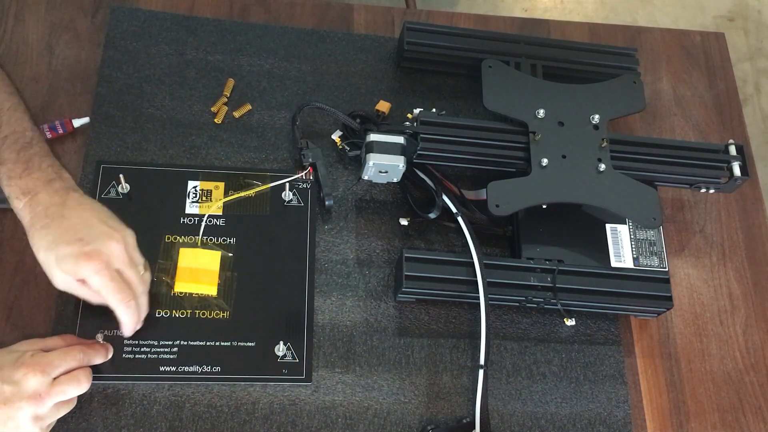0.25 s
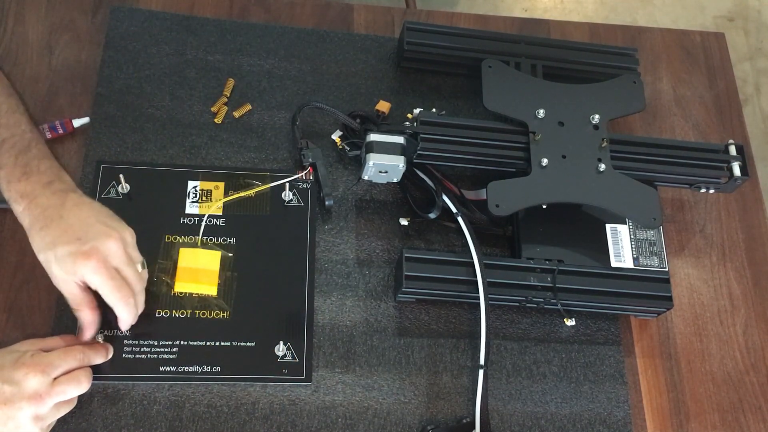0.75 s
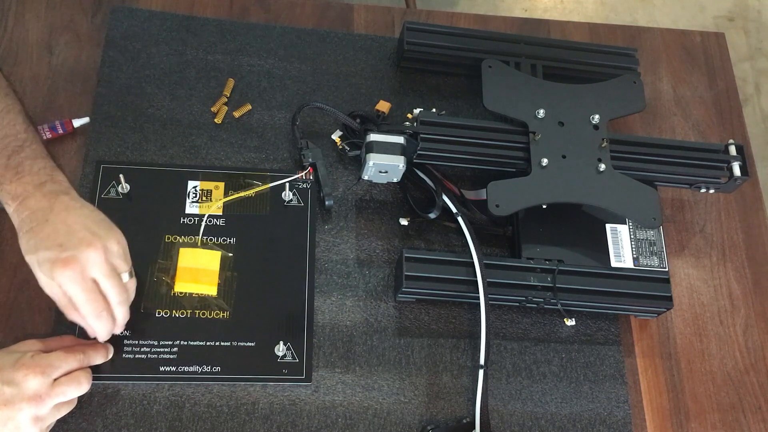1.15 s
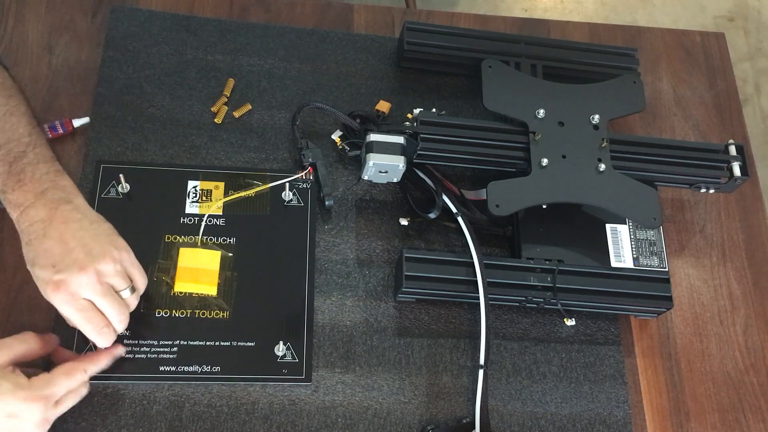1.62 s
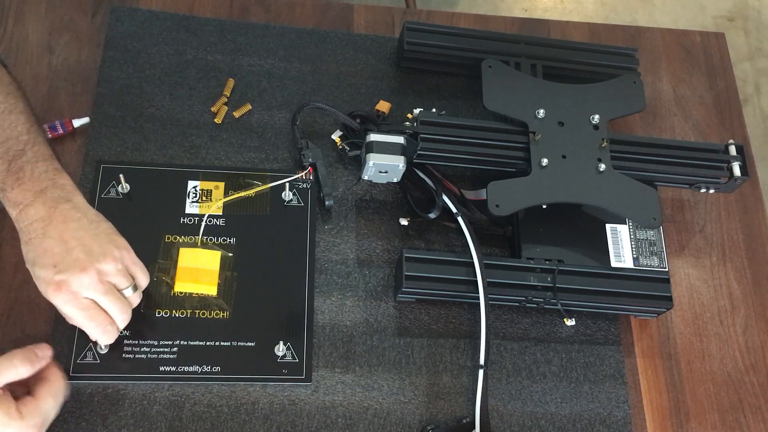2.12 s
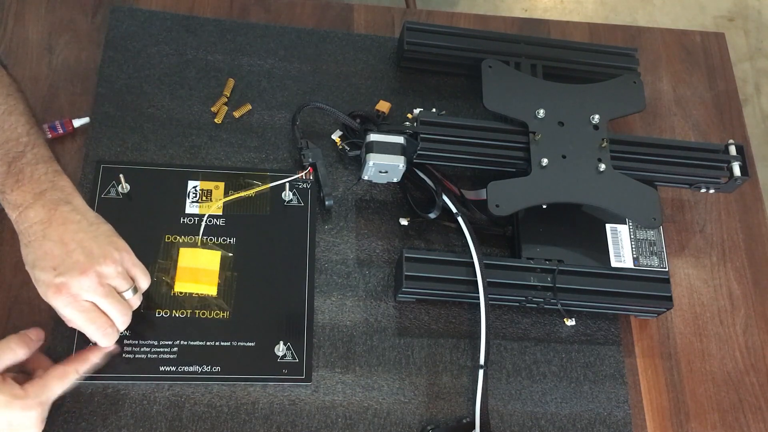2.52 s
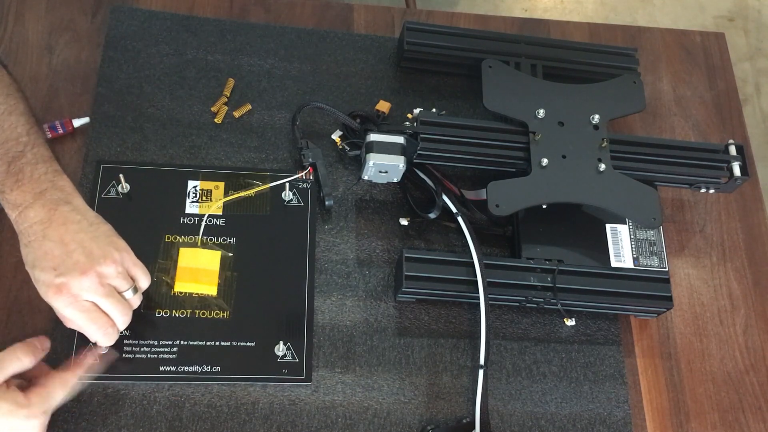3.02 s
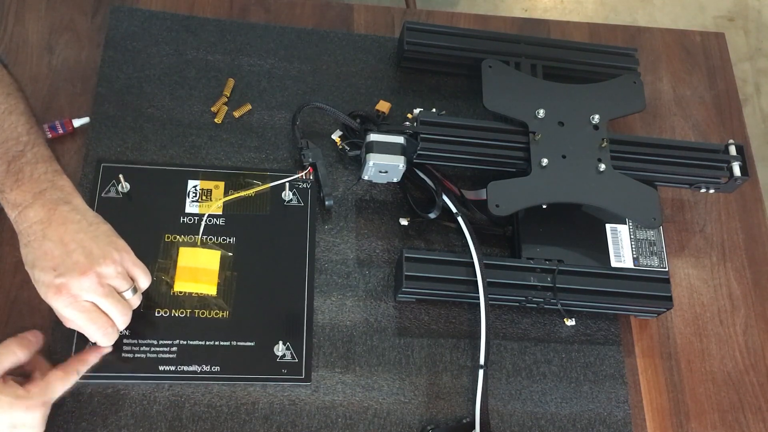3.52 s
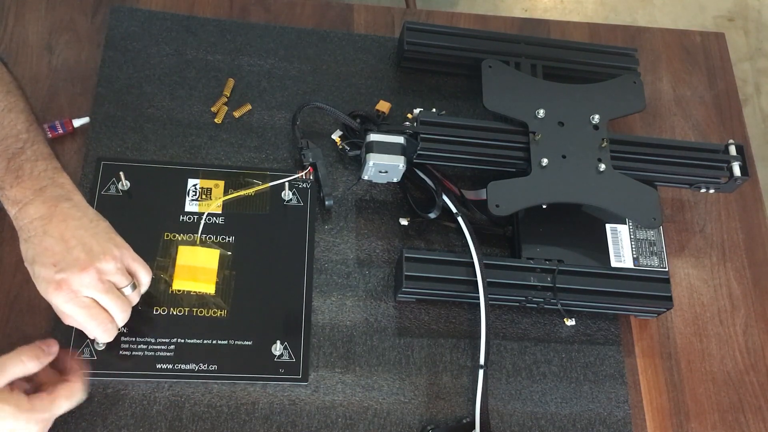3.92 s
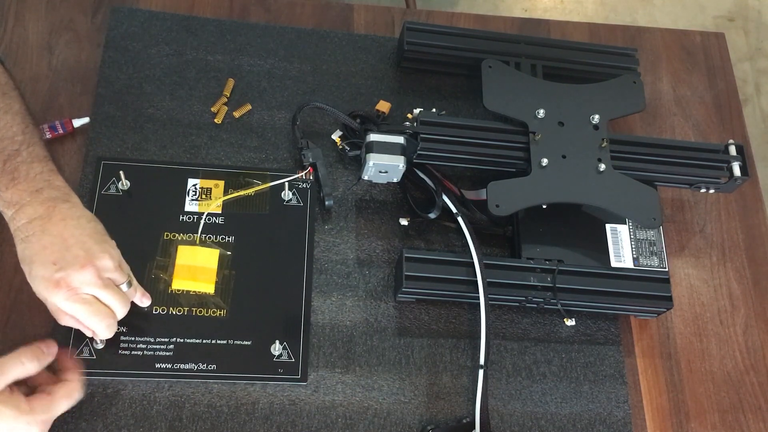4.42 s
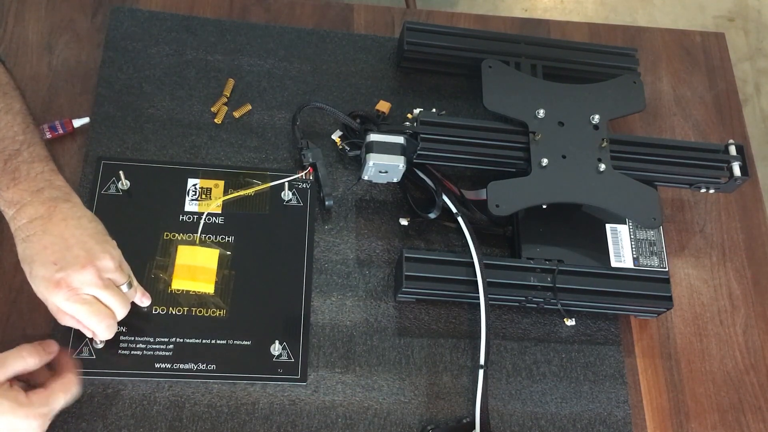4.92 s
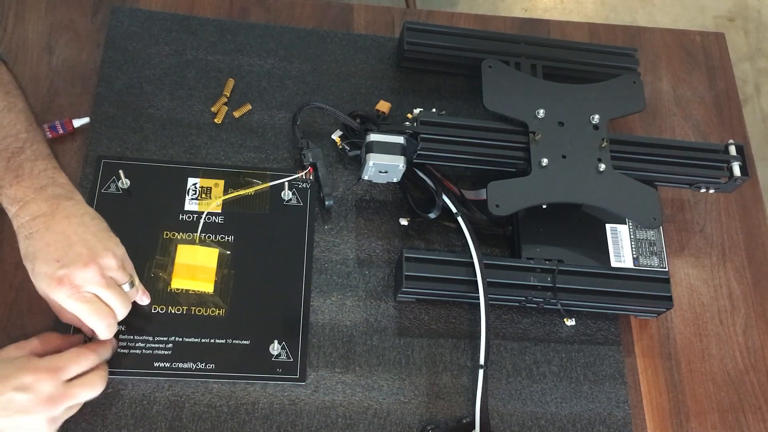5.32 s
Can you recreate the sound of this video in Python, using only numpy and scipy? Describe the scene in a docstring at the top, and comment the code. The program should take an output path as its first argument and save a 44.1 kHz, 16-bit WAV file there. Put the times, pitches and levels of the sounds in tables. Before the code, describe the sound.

In a bare workshop, a steel nut and washer are spun by hand on a screw at a plate's corner. A few faint ticks and soft skin rubs come first, then a regular run of about four strokes a second, each a tick, knock and short ringing scrape, growing louder and brighter. Faint unsteady machine hum continues behind. Close, single-channel pickup with a short diffuse echo.

```python
"""A steel nut is spun by hand down a screw on the corner of a metal plate, at its busiest four strokes a second.
In each stroke the fingers catch the nut (a tick), it breaks free (a knock) and runs along the thread,
rattling its washer (a scrape). The harder the flick, the louder, shorter and brighter the run.
Random collisions ring the modes of screw and plate, and a bare workshop answers with a diffuse noise tail.
Behind the handwork lies the faint hum of machines and fans: unsteady sines and coloured noise, on one channel."""
import sys
import numpy as np
from scipy import signal
from scipy.fft import rfft, irfft, next_fast_len
from scipy.io import wavfile
from scipy.ndimage import map_coordinates

SR = 44100
rng = np.random.default_rng(int(sys.argv[2]) if len(sys.argv) > 2 else 0)


def dump(signal):
    """Clip the signal to [-1, 1] and save it as 16-bit WAV at the path in sys.argv[1]."""
    limited = np.clip(np.atleast_2d(signal).T, -1, 1)
    pcm = np.round(limited * 32767).astype(np.int16)
    wavfile.write(sys.argv[1], SR, pcm)


N = 244755

# Flicks of the nut: [catch t/s, catch level/dB before the lift in tick(), catch brightness/(dB/octave),
# time held until it breaks free/s, knock level/dB before that lift, time from then to full spin/s, run level/dB]
FLICKS = [(.236, -51.5, -1.5, .044, -48, 0.017, -46.5), (.541, -46.5, -1, 0.045, -42, .02, -46.5),
          (0.856, -48.5, 2.5, 0.066, -38.5, .032, -46), (1.488, -42, 3, .004, -46, .008, -54),
          (2.1, -49, -4, .037, -34, .034, -39.5), (2.343, -39, -7, .052, -28.5, .029, -34.5),
          (2.614, -45.5, -5.5, .039, -30, .008, -31), (2.866, -41, -4, .038, -28.5, .044, -29.5),
          (3.112, -40, -3, .021, -30.5, 0.031, -30), (3.351, -37, -0.5, 0.022, -34, .013, -27.5),
          (3.604, -38, -4, .039, -32.5, .005, -29.5), (3.857, -37.5, -8, 0.031, -42, .007, -28),
          (4.114, -41, 4.5, 0.029, -29, .015, -29), (4.362, -35, 6.5, 0.048, -34, .005, -23),
          (4.63, -28, 5, 0.038, -35.5, .005, -26)]


def amp(db):
    """Decibels to gain."""
    return 10 ** (np.asarray(db) / 20)


def rms(x):
    """Root mean square."""
    return np.sqrt(np.mean(x ** 2))


def unit(x):
    """Scale to rms 1."""
    return x / np.sqrt(np.mean(x ** 2) + 1e-20)


def along(points, hz):
    """Interpolate (Hz, value) points on a log frequency axis."""
    f, v = np.transpose(points)
    return np.interp(np.log(hz + 1), np.log(f + 1), v)


def curve(rows):
    """Interpolate (s, value) rows to one value per sample."""
    return np.interp(np.arange(N) / SR, *np.transpose(rows))


def wobble(rate, size=N):
    """A smooth random curve with rate knots a second."""
    knots = rng.standard_normal(int(size * rate / SR) + 4)
    return map_coordinates(knots, [np.arange(size) * rate / SR])


def filtered(x, response):
    """Multiply the spectrum of x by a response of frequency."""
    m = next_fast_len(len(x) + 8192)  # zero padding leaves room for ringing
    return irfft(rfft(x, m) * response(np.fft.rfftfreq(m, 1 / SR)), m)[:len(x)]


def noise(spectrum, size=N):
    """Noise of rms 1, coloured by (Hz, dB) points."""
    return unit(filtered(rng.standard_normal(size), lambda hz: amp(along(spectrum, hz))))


def swell(t, rise, fall):
    """Exponential rise to a peak at t = 0, then exponential fall."""
    return np.exp(-np.abs(t) / np.where(t < 0, rise, fall))


def add(track, s, sound):
    """Mix a sound into the track from time s on."""
    start = max(round(s * SR), 0)
    track[start:start + len(sound)] += sound[:N - start]


def tone(hz, wander_hz):
    """A sine of rms 1 whose pitch wanders, as of a slightly unsteady machine."""
    cycles = np.cumsum(hz + wander_hz * wobble(8)) / SR
    return np.sqrt(2) * np.sin(2 * np.pi * (cycles + rng.random()))


def hum():
    """Machines drone and whine as wandering sines; fans move air, heard as coloured noise."""
    # steady machine tones, then fan tones: [f/Hz, level/dB, wander/Hz]
    machine_tones = [(51, -62.5, 1.19), (58.6, -61.5, 0.84), (96.7, -62.5, 4.4), (120.3, -63.5, 0.87),
                     (125.5, -61.5, 0.3), (339.7, -74, 1.08), (361, -73.5, 0.64), (598, -76, 1.75)]
    fan_tones = [(800.5, -72, .3), (873, -76, 1.5), (1943, -82, 1), (2401, -81, 1), (2611, -79, 1),
                 (3205, -84, 1)]
    # a thin high whine that comes and goes: [f/Hz, level/dB before its random swing]
    whine_tones = [(3483, -77), (3505, -81)]
    # a tone that fades out, and a low rush that takes over from it: [t/s, level/dB]
    drone_levels = [(0, -62), (.5, -67), (2.45, -63), (2.7, -65.5), (5.55, -81)]
    rush_levels = [(0, -73), (2.4, -66), (2.7, -61.5), (5.55, -60.5)]
    # colour of moving air: [f/Hz, relative level/dB per Hz]
    air_colour = [(15, -36), (27, -2), (40, 6), (110, 3.5), (150, -3.5), (320, -4.5), (450, -8.5),
                  (600, -6), (1100, -14), (2000, -15), (2550, -15), (3200, -19), (7000, -31.5),
                  (15500, -38.5)]
    tones = sum(amp(db) * tone(hz, wander) for hz, db, wander in machine_tones + fan_tones)
    whine = sum(amp(db + 3.9 * wobble(2.72)) * tone(hz, 4.94) for hz, db in whine_tones)
    drone = amp(curve(drone_levels)) * tone(334, 0.52)
    rush_colour = [(60, -3), (180, -4.5), (300, 6.0), (420, -10.0), (900, -16.5), (2000, -38)]
    rush = amp(curve(rush_levels)) * noise(rush_colour)
    air = amp(-56.5 + 0.05 * wobble(4.1)) * noise(air_colour)
    return tones + whine + drone + rush + air


def workshop(x, wet_db):
    """A sound and its echo: a diffuse tail builds up, then each frequency dies at its own speed."""
    # time for the echo to die by 60 dB: [f/Hz, t60/s]
    decay_times = [(300, 0.33), (1800, 0.6), (5000, 0.6), (9000, 0.53), (14000, 0.41)]
    # colour of the reflections: [f/Hz, relative level/dB]
    wall_colour = [(300, 1.5), (1700, 2), (2500, -4), (3700, 5), (6000, 0.5), (9000, 1.5), (14000, -5.5)]
    build_s = 0.00043
    hz, t, z = signal.stft(rng.standard_normal(SR * 3 // 4), SR, nperseg=256)
    decay = amp(along(wall_colour, hz)[:, None] - 60 * t / along(decay_times, hz)[:, None])
    build = 1 - np.exp(-t / build_s)
    tail = signal.istft(z * decay * build, SR, nperseg=256)[1]
    echo = amp(wet_db) * tail / np.linalg.norm(tail)
    return signal.fftconvolve(x, signal.unit_impulse(len(tail)) + echo)


def resonances(modes, f):
    """Causal response of damped (Hz, width in Hz, dB) modes."""
    return sum(amp(db) * 1j * f * w / (c * c - f * f + 1j * f * w) for c, w, db in modes)


def chatter(size, spread_db):
    """Tiny collisions of rough steel, of widely scattered strength."""
    return rng.standard_normal(size) * amp(spread_db * rng.standard_normal(size))


def contact(grip, spread_db, db, bright, grit_db):
    """Chatter under a force envelope rings the steel and radiates as grit; db is the level at full force."""
    # ring of nut, screw and plate, before each touch shifts it: [f/Hz, width/Hz, relative level/dB]
    steel_modes = [(1310, 150, -25.5), (1776, 93, -9), (1930, 44, -11.5), (2520, 35, -12), (2524, 92, 4.5),
                   (2600, 80, -1.5), (3515, 69, -7.5), (3704, 87, -6.5), (4224, 85, -9.5), (5210, 88, -1.5),
                   (5465, 134, -4), (5635, 180, -5), (6130, 67, -29), (6220, 230, -10), (6774, 135, -7.5),
                   (6800, 190, -17), (8060, 120, -12.5), (8760, 240, -16), (8800, 260, -33),
                   (9740, 320, -9.5), (11040, 240, -8), (12640, 340, -10), (13500, 270, -8),
                   (14000, 110, -24)]
    # the plate's dense weak modes, heard as grit: [f/Hz, relative level/dB per Hz]
    plate_colour = [(150, -3), (500, -16.5), (900, -8), (1400, -14.5), (1800, -1.5), (2600, 3), (4200, 1.5),
                    (5400, 1.5), (7000, 0), (9600, 1), (10500, -25), (11300, 4.5), (12400, -9.5),
                    (14500, -37), (16000, 4)]
    detune, vary_db = 0.007, 2  # scatter of pitch as a fraction, and of level
    # the fingers shift and damp the modes differently at each touch
    modes = [(hz * (1 + detune * rng.normal()), width, level + vary_db * rng.normal())
             for hz, width, level in steel_modes]
    ringing = filtered(chatter(len(grip), spread_db) * grip, lambda hz: resonances(modes, hz))
    grit = filtered(chatter(len(grip), spread_db) * grip, lambda hz: amp(along(plate_colour, hz)))
    sound = unit(ringing) + amp(grit_db) * unit(grit)
    # light collisions last longer and lose the highest treble
    edge_hz = 12000 * amp(0.16 * (db + 54.5))

    def colour(hz):
        tilt = amp(bright * np.log2(np.hypot(hz, 2500) / 4500))  # flattens out below 2500 Hz
        return tilt / np.hypot(1, (hz / edge_hz) ** 3)

    return amp(db) * unit(filtered(sound, colour)) * rms(grip)


def tick(db, bright):
    """A blow of the nut with a few milliseconds of chatter; soft ones mostly ring, hard ones crack."""
    attack_s, fall_s, lift_db = 0.0001, 0.0031, 2.0
    grip = swell(np.arange(SR // 12) / SR - .001, attack_s, fall_s)
    grit_db = 3.0 + 0.93 * bright
    return workshop(contact(grip, 3.35, db + lift_db, bright, grit_db), wet_db=-3)


def catches():
    """Each stroke ticks as the fingers catch the nut, rattles a little and knocks as it breaks free."""
    strays_per_stroke, stray_db, scatter_db = 2, -17, 4  # small ticks, dB against the run
    stray_bright, break_bright = -9, -6  # dB per octave
    track = np.zeros(N)
    for s, catch_db, catch_bright, hold, knock_db, spin_up, run_db in FLICKS:
        add(track, s, tick(catch_db, catch_bright))
        for share in rng.random(strays_per_stroke):  # anywhere from the catch to full spin
            level_db = run_db + stray_db + scatter_db * rng.normal()
            add(track, s + share * (hold + spin_up), tick(level_db, stray_bright))
        add(track, s + hold, tick(knock_db, break_bright))
    return track


def scrapes():
    """The chatter swells as the freed nut spins up, catches unevenly on the thread and dies as it stops."""
    usual_db = -30  # run level of an ordinary flick
    rise_s, fall_s, shortens = 0.0067, 0.011, 0.52  # length goes as amplitude to the power -shortens
    usual_bright, brightens = 0.18, 0.17  # dB per octave, and its gain per dB of flick
    creep_s = .012  # the nut starts to creep just before it breaks free
    track, t = np.zeros(N), np.arange(-SR // 8, SR // 4) / SR  # t = 0 at full spin
    for s, _, _, hold, _, spin_up, db in FLICKS:
        effort_db = db - usual_db
        length = amp(-shortens * effort_db)
        bright = usual_bright + brightens * effort_db
        freed = np.exp(np.minimum(t + spin_up, 0) / creep_s)
        stroke = freed * swell(t, rise_s * length, fall_s * length)
        uneven = stroke * amp(0.5 * wobble(395.5, size=len(t)))
        grip = unit(uneven) * rms(stroke)
        sound = contact(grip, 5, db, bright, grit_db=1 + 0.19 * bright)
        add(track, s + hold + spin_up + t[0], workshop(sound, wet_db=-5.0))
    return track


def fingertip_taps():
    """A fingertip taps the plate dully: short swells of mostly low noise."""
    # taps: [t/s of the peak, level/dB]
    taps = [(0.907, -41), (4.915, -45), (5.181, -49)]
    t = np.arange(N) / SR
    blows = sum(amp(db) * swell(t - s, .0005, 0.0036) for s, db in taps)
    return blows * noise([(150, -22), (600, 19), (1150, 21), (1700, -25), (6000, -40)])


def nudges():
    """The nut ticks as it is nudged in the play of its thread without spinning."""
    # nudges: [t/s, level/dB before the lift in tick(), brightness/(dB/octave)]
    touches = [(1.628, -50, -7), (1.824, -42.5, -14), (1.853, -43.5, -10), (1.863, -45, -9.5),
               (2.371, -42.5, -17), (2.384, -38, -6.5), (4.877, -45.5, -3.5), (4.917, -49, -3),
               (5.127, -53, -1), (5.179, -47, 1), (5.39, -42, -11.5), (5.498, -48.5, -2)]
    track = np.zeros(N)
    for s, db, bright in touches:
        add(track, s, tick(db, bright))
    return track


def skin_rubs():
    """Skin slides over the plate with a soft hiss; every slide swells and fades alike."""
    # slides: [t/s of the peak, level/dB]
    slides = [(1.665, -60), (1.755, -53.5), (1.845, -54.5), (2.072, -57.5), (5.51, -60.5)]
    rise_s, fall_s = 0.025, 0.019
    t = np.arange(N) / SR
    pressure = sum(amp(db) * swell(t - s, rise_s, fall_s) for s, db in slides)
    return pressure * noise([(300, -23), (1500, 2.0), (5000, 0), (9000, -4.5), (12500, -4.5), (15500, -11)])


def scene():
    """The handwork in its workshop and the hum behind it, in one channel."""
    skin = workshop(fingertip_taps() + skin_rubs(), wet_db=-7)[:N]
    return (hum() + catches() + scrapes() + nudges() + skin)[None]


def record(dry):
    """The recorder's response falls steeply at its band limit."""
    top_hz = 15900
    return np.array([filtered(channel, lambda hz: 1 / (1 + (hz / top_hz) ** 100)) for channel in dry])


dry = scene()
out = record(dry)
dump(out)
```